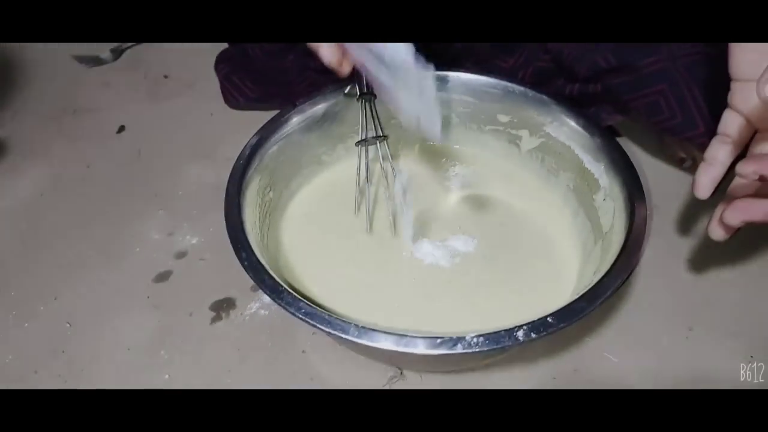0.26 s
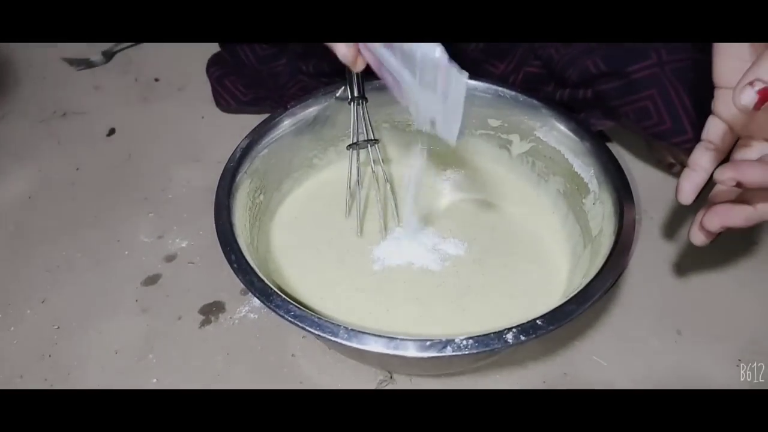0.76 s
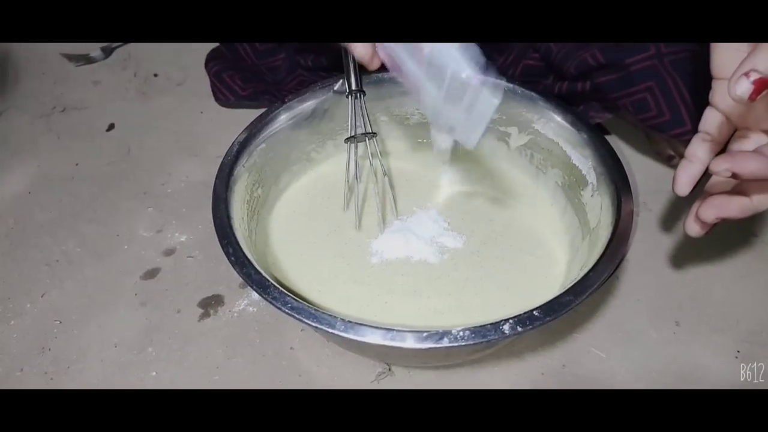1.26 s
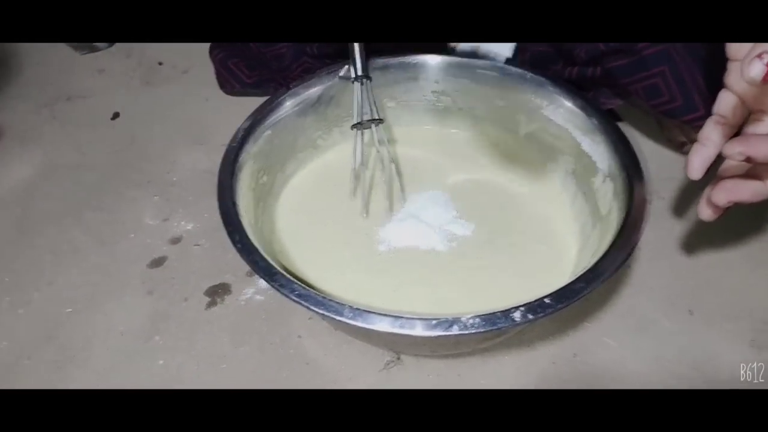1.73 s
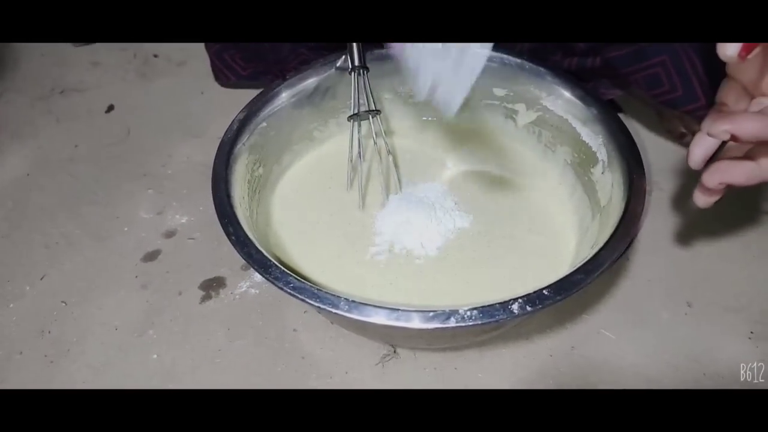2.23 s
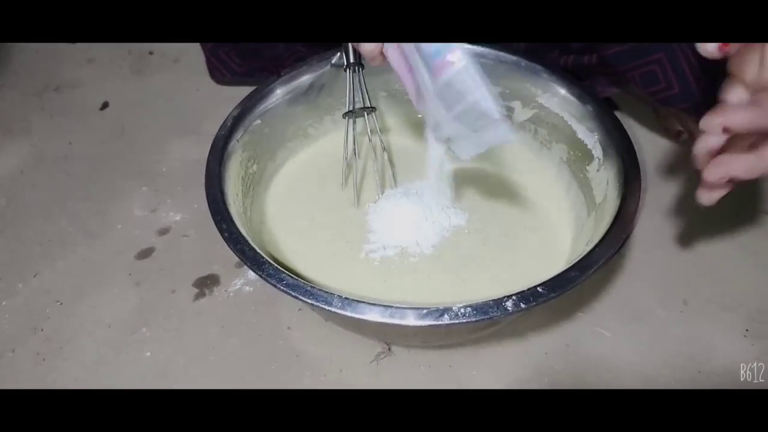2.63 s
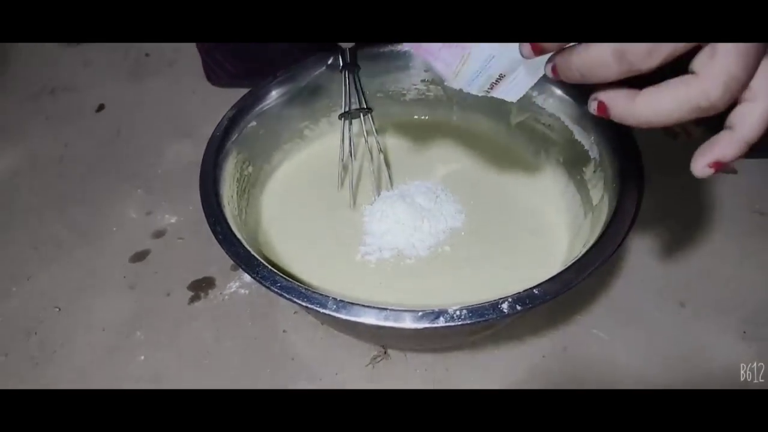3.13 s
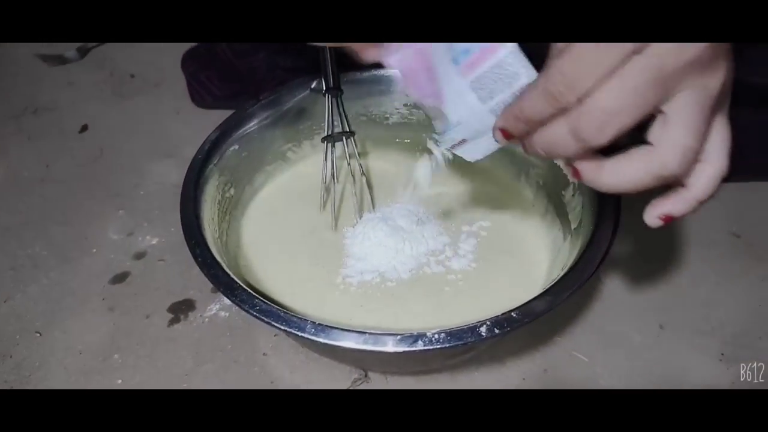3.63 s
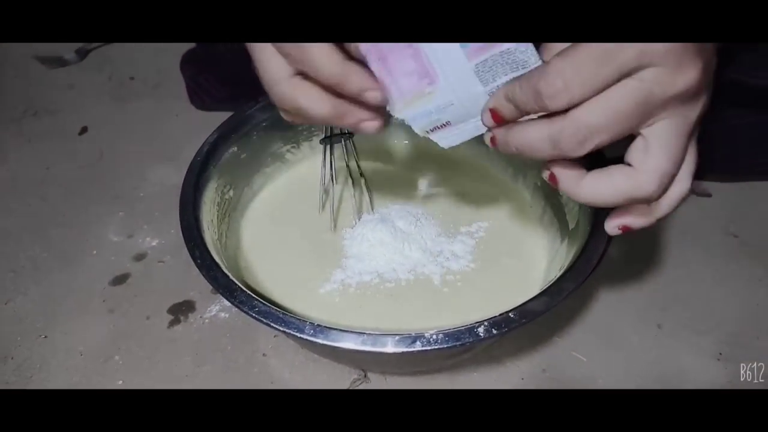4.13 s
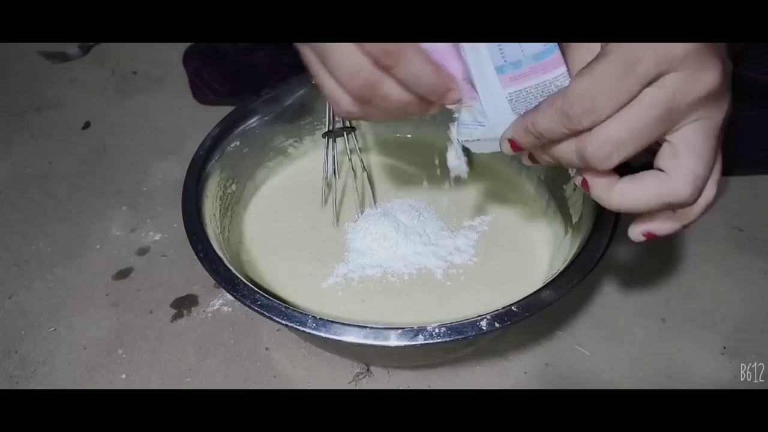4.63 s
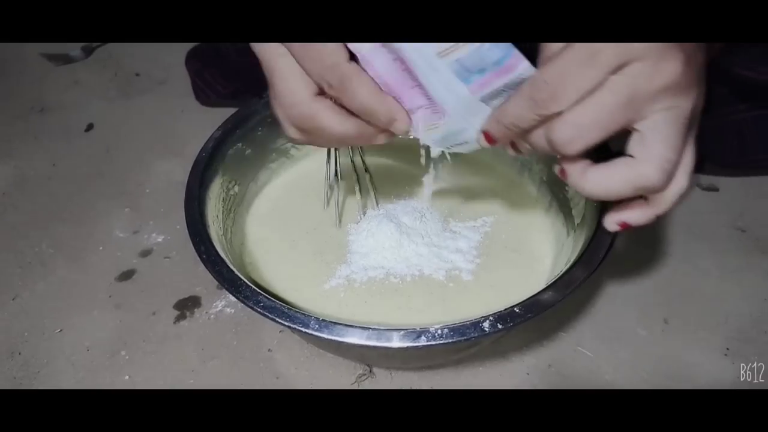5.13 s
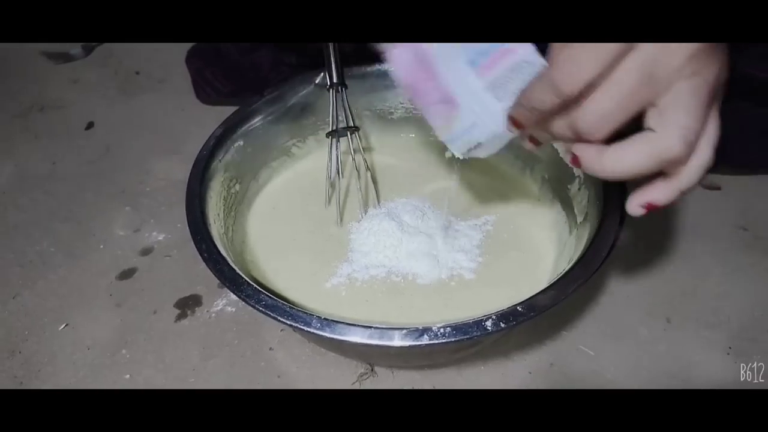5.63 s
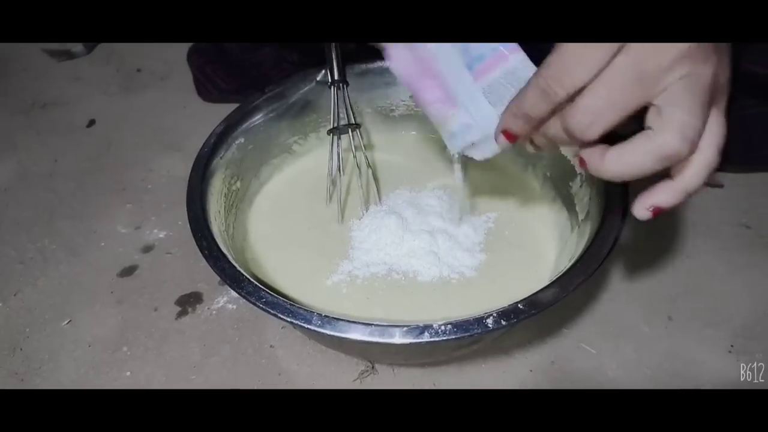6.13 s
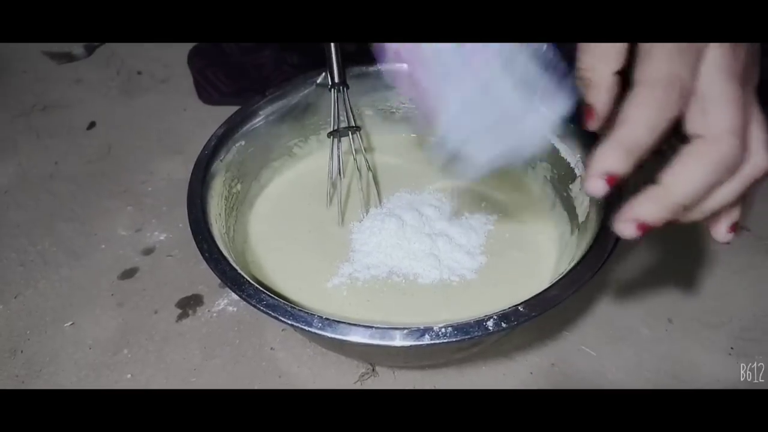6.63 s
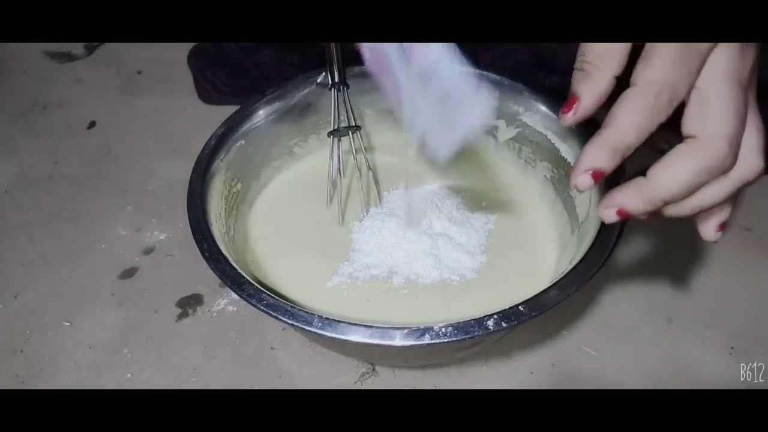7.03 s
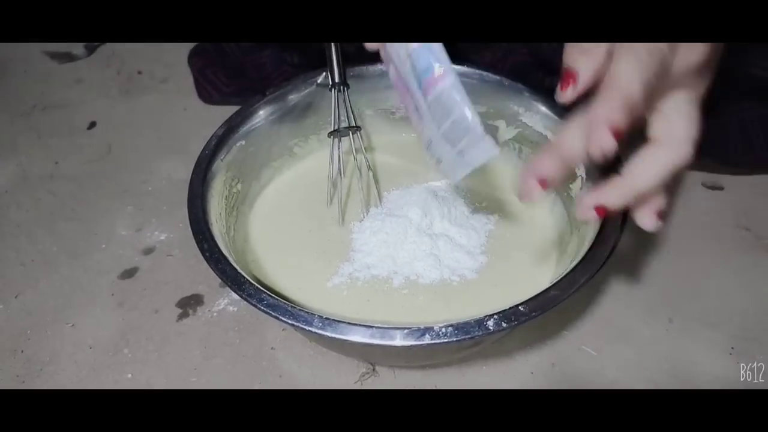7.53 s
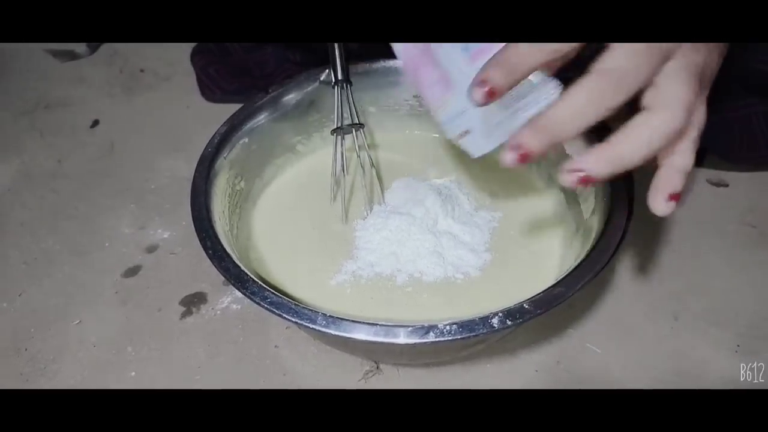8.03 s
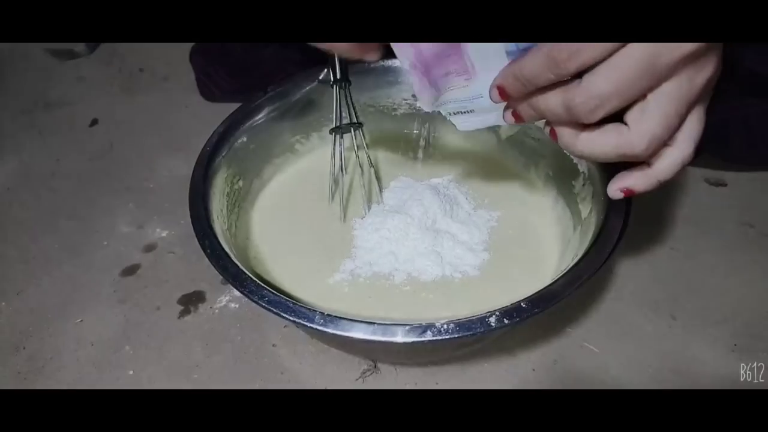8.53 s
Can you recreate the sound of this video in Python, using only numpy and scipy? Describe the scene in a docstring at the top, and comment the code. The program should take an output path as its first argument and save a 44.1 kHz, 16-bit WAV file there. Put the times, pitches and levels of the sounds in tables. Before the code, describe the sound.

A thin plastic packet is shaken and crinkled as powder hisses out, close by in a quiet kitchen with faint crickets outside.

```python
"""A quiet kitchen at night, one microphone close to a steel bowl of batter.
Just over the bowl a thin plastic packet is shaken, then squeezed: powder hisses as it slides, creases
buckle with a snap and a brief ring, fingers rub the soft filling, and metal jewellery on the hand tinkles.
Farther off, over a low hum, crickets trill outside with their wings, a higher insect chirps,
and a faint rasp flutters once at the start."""
import sys
import numpy as np
from scipy import signal
from scipy.fft import rfft, irfft
from scipy.io import wavfile
from scipy.ndimage import uniform_filter1d

SR = 44100
rng = np.random.default_rng(int(sys.argv[2]) if len(sys.argv) > 2 else 0)


def log_audio(samples):
    """Write samples as a 16-bit WAV file to the path given in sys.argv[1]."""
    # one column per channel
    frames = np.atleast_2d(samples).T
    # limit to full scale, then quantise
    limited = np.clip(frames, -1, 1)
    pcm = np.round(limited * 32767).astype(np.int16)
    wavfile.write(sys.argv[1], SR, pcm)


N = 386316


def amp(db):
    """Decibels to gain."""
    return 10 ** (np.asarray(db) / 20)


def rms_one(x):
    """Scale to rms 1."""
    return x / np.sqrt(np.mean(x ** 2) + 1e-20)


def band(x, low_hz, high_hz):
    """Band-pass."""
    return signal.sosfilt(signal.butter(2, [low_hz, high_hz], "band", fs=SR, output="sos"), x)


def highpass(x, hz):
    """Roll off the bass."""
    return signal.sosfilt(signal.butter(3, hz, "high", fs=SR, output="sos"), x)


def colour(x, spectrum):
    """Filter by a (frequency [Hz], level [dB]) spectrum; white noise keeps its rms."""
    hz, db = np.transpose(spectrum)
    grid = np.maximum(np.fft.rfftfreq(len(x), 1 / SR), 1)
    gain = amp(np.interp(np.log(grid), np.log(hz), db, left=-60))
    return irfft(rfft(x) * rms_one(gain), len(x))


def drift(hz):
    """A random wander of rms 1, mostly slower than hz."""
    r = np.exp(-2 * np.pi * hz / SR)
    return rms_one(signal.lfilter([1], [1, -2 * r, r * r], rng.standard_normal(N + SR))[SR:])


def ring(x, hz, t60):
    """One resonance: a unit click starts a dying sine of height about 1."""
    r, w = amp(-60 / (t60 * SR)), 2 * np.pi * hz / SR
    return signal.lfilter([0, np.sin(w)], [1, -2 * r * np.cos(w), r * r], x + 1e-18)


def grains(per_s, spread_db):
    """Random clicks, a few much larger than the rest; rms 1."""
    sizes = amp(spread_db * np.minimum(rng.exponential(1, N), 4)) * rng.choice([-1, 1], N)
    return rms_one(sizes * (rng.random(N) < per_s / SR))


def swells(rows):
    """Bell-shaped envelopes from (time [s], level [dB], half length [s]) rows."""
    t = np.arange(N) / SR
    return sum(amp(db) * np.exp(-((t - s) / half) ** 2) for s, db, half in rows)


# Night air and hum all round the microphone: (frequency [Hz], relative level [dB])
AIR_SPECTRUM = [(40, -14), (121, 5.5), (350, -1.5), (600, -8), (1200, -6.5), (1950, -7), (2250, -0.5),
                (2500, -7.5), (4000, -15), (6300, -20), (7000, -9), (8400, -6), (9400, -15), (12500, -17.5),
                (15600, -18)]


def night_air():
    """Room tone: steady noise with a low hum, and one thin, faint tone."""
    air = amp(-59.5) * colour(rng.standard_normal(N), AIR_SPECTRUM)
    thin_tone = rms_one(ring(rng.standard_normal(N), hz=2735, t60=.07))
    return air + amp(-73) * thin_tone


# Bouts of cricket song out in the yard: (time [s], phrase spacing [s], relative level [dB])
CRICKET_BOUTS = [(-.08, .31, -58), (.46, .3, -58), (1.02, .245, -57), (3.24, .31, -58), (6.87, .265, -58),
                 (8.24, .26, -57)]
# Length of each bout: (phrases [count])
PHRASES_PER_BOUT = 1, 2, 7, 12, 4, 2


def crickets():
    """Phrases of wing strokes, each stroke falling in pitch; the yard smears them into a narrow wash."""
    strokes_per_s, centre_hz, fall_hz = 22, 4723, 422
    sung_share, yard_t60_s = .84, .16
    t, song, level = np.arange(N) / SR, np.zeros(N), np.zeros(N)
    waver_hz = 70 * drift(53.7)
    for (first, gap, db), count in zip(CRICKET_BOUTS, PHRASES_PER_BOUT):
        length = sung_share * gap
        for start in first + gap * np.arange(count):
            on = (t >= start) & (t < start + length)
            age = t[on] - start
            stroke = (strokes_per_s * age) % 1
            hz = centre_hz + fall_hz * (.5 - stroke) + waver_hz[on]
            tone = np.sin(2 * np.pi * np.cumsum(hz) / SR)
            level[on] = amp(db) * np.sin(np.pi * age / length) ** .4
            song[on] = level[on] * np.sin(np.pi * stroke) ** .83 * tone
    fade = amp(-2 * 60 / (yard_t60_s * SR))
    lingering = np.sqrt(signal.lfilter([1 - fade], [1, -fade], level ** 2))
    wash = rms_one(band(band(rng.standard_normal(N), 4540, 5010), 4540, 5010))
    far_singers = amp(-74)
    flicker = amp(2 * drift(130))
    return 1.44 * song * flicker + (amp(-8) * lingering + far_singers) * wash


# The swell of a rasp far from the microphone: (time [s], relative level [dB], half length [s])
RASP_SWELL = (0.16, -56, 0.32)
# Its resonances: (frequency [Hz], relative level [dB], t60 [s])
RASP_RESONANCES = [(755, -21, 0.017), (1540, 3, 0.0094), (1750, 0, 0.022), (2100, -8, .015)]


def far_rasp():
    """One swell of noise with seven quick beats on top, sounding through a few resonances."""
    beats = [(.022 + k * .063, -57.5, .01) for k in range(7)]
    flutter = swells([RASP_SWELL] + beats) * rng.standard_normal(N)
    return amp(-24) * sum(amp(db) * ring(flutter, hz, t60) for hz, db, t60 in RASP_RESONANCES)


# Bouts of a higher insect outside: (time [s], chirp spacing [s], chirps [count])
INSECT_BOUTS = [(.15, .232, 6), (1.57, .255, 6), (3.07, .225, 6), (4.42, .25, 9), (6.72, .233, 9)]


def high_insect():
    """Short, evenly spaced chirps of narrow, high noise."""
    chirps = swells([(s + k * gap, -64.5, .028) for s, gap, count in INSECT_BOUTS for k in range(count)])
    return chirps * rms_one(ring(rng.standard_normal(N), hz=8860, t60=.035))


# Shakes of the packet, close to the microphone: (time [s], level [dB])
PACKET_SHAKES = [(.346, -61), (.593, -48.5), (.855, -50), (1.147, -49), (1.428, -53), (1.704, -44),
                 (1.982, -42.5), (2.234, -43), (2.524, -45), (2.776, -43.5), (2.914, -65), (6.82, -41.5),
                 (7.07, -44), (7.21, -57), (7.348, -42), (7.58, -46.5), (7.801, -47.5), (8.06, -46),
                 (8.44, -53), (8.63, -54)]


def shaking():
    """Envelope of the shakes: a weaker forward stroke leads each back stroke."""
    flick_s, swing_s, swings_from_s = .018, .034, 3   # half lengths: quick flicks, then looser swings
    lead_s, lead_db = .049, -10
    back = [(s, db, flick_s if s < swings_from_s else swing_s) for s, db in PACKET_SHAKES]
    forward = [(s - lead_s, db + lead_db, half) for s, db, half in back]
    return swells(back + forward)


# Powder sliding on plastic, heard close: (frequency [Hz], relative level [dB])
POWDER_SPECTRUM = [(2500, -7.5), (5800, -10.5), (7250, -3), (11600, 4.5), (13800, -4.5), (15600, 5)]


def sliding_powder(shakes):
    """Each shake throws the powder along the film; its tiny clicks merge into a hiss."""
    return shakes * colour(grains(per_s=9000, spread_db=4), POWDER_SPECTRUM)


# Crests of a soft hiss in the background: (time [s])
HISS_TIMES = [.48, 1.7, 3.22]
# Its colour: (frequency [Hz], relative level [dB])
HISS_SPECTRUM = [(6000, -8), (7500, 7), (9300, 10), (11500, -17)]


def soft_hiss():
    """A narrow, high hiss swells and fades."""
    envelope = swells([(s, -58, .059) for s in HISS_TIMES])
    return envelope * colour(rng.standard_normal(N), HISS_SPECTRUM)


# Resonances of the packet: (frequency [Hz], width [Hz], relative level [dB])
FILM_RESONANCES = [(686, 110, 0), (1820, 75, 4), (2230, 33, -0.5), (2632, 22, -7), (3260, 300, 7.5)]


def film_body(x):
    """The packet's broad voice with its resonances on top."""
    ringing = sum(amp(db) * ring(x, hz, 1.02 / width) for hz, width, db in FILM_RESONANCES)
    return band(x, 580, 3930) + amp(-31.5) * ringing


# Creases buckling close to the microphone: (time [s], ring level [dB], brightness [dB], ring pitch [Hz])
CREASES = [(0.7936, -43.5, -25, 1430), (0.8668, -37, -11.5, 1830), (1.8938, -37, -23, 2230),
           (1.925, -35, -13, 1720), (1.954, -41, -5, 1770), (1.9835, -37, -1.5, 3870),
           (2.167, -36.5, -16, 1420), (2.4569, -32.5, -15, 1520), (2.7125, -34.5, -15, 1720),
           (2.7657, -43.5, -3, 1760), (3.205, -34, -10, 3920), (3.3282, -36.5, -15, 1750),
           (3.3583, -31, -24, 1390), (3.3812, -37, -25, 1740), (3.4126, -30, -24, 1450),
           (3.473, -41.5, -33, 1400), (3.562, -34.5, -24, 3980), (3.607, -38, 1, 3360),
           (3.613, -29, -1.5, 1710), (3.645, -41, -22, 1380), (3.7184, -28.5, -18, 1740),
           (3.797, -42, -19, 1750), (3.8227, -34.5, -13, 1830), (3.8352, -26.5, -11.5, 1830),
           (3.906, -42, -12, 3310), (3.9177, -33.5, -7, 1770), (3.9422, -33, -18, 1400),
           (3.9577, -35, -13, 1580), (3.982, -33, -29, 1850), (3.998, -34, -22, 1460),
           (4.069, -36.5, -32, 1800), (4.3969, -35.5, -32, 1410), (4.4716, -30, -8, 1860),
           (4.4864, -22.5, -6.5, 2170), (4.5491, -24.5, -14, 1820), (4.5998, -10.5, -9.5, 1950),
           (4.6346, -24, -10, 1650), (4.6717, -28, -14, 1840), (4.7464, -25, -30, 1550),
           (4.7666, -17, -7.5, 1710), (4.792, -21.5, -7, 3760), (4.815, -28.5, -9, 1580),
           (4.8605, -17, -12, 3550), (4.8965, -31.5, -5, 1840), (4.918, -14.5, -15, 1750),
           (4.9246, -8, -18.5, 2190), (4.9331, -12, -9, 2710), (5.0556, -19, -2.5, 4200),
           (5.0814, -27, 0, 1870), (5.1102, -24.5, -3.5, 1820), (5.1435, -28, -15, 1850),
           (5.1516, -28, -6, 2170), (5.1796, -14, -2, 1800), (5.2216, -17, -5, 1780),
           (5.2415, -17, -15, 1940), (5.2851, -20, -14.5, 1910), (5.3253, -25, -12, 2150),
           (5.3642, -23, -27, 1490), (5.5353, -20.5, 0, 1650), (5.5931, -27, 7, 3800),
           (5.678, -17.5, -3, 1440), (5.7055, -26.5, 0.5, 1910), (5.799, -33.5, -22, 1350),
           (5.8187, -30, -14, 1280), (5.8329, -10.5, -7, 1360), (5.9295, -25, -5, 3340),
           (5.9404, -15, -5.5, 1660), (5.9693, -20, -0.5, 1370), (5.9973, -15, 4, 2150),
           (6.0698, -13.5, -4, 1820), (6.0975, -13.5, -15, 1820), (6.1462, -23, -31, 1780),
           (6.1613, -12.5, -13, 1580), (6.1771, -18, -13, 1730), (6.1916, -11, -9, 1800),
           (6.2039, -15, 4.5, 1330), (6.281, -12.5, 0, 2310), (6.2995, -14.5, -7, 1640),
           (6.3083, -20, 1, 1590), (6.332, -12.5, -2.5, 2200), (6.35, -15, -7, 3280),
           (6.3859, -15.5, -4, 1790), (6.3926, -13.5, -1, 3360), (6.4098, -13, -11.5, 1820),
           (6.4349, -8, -3.5, 1820), (6.4664, -22, -11, 1820), (6.4795, -15.5, -18, 3320),
           (6.4972, -19.5, -3, 2160), (6.56, -16.5, -1.5, 1990), (6.5982, -19.5, -13, 3180),
           (6.6249, -25, -9.5, 1970), (6.793, -30, -13.5, 1500), (6.8246, -30.5, -12, 1950),
           (6.867, -35, -10.5, 1690), (7.2789, -30.5, -4.5, 3550), (7.3244, -31.5, 2, 1310),
           (7.355, -52, 11, 2220), (7.5888, -59, 20, 2100), (7.743, -49, 3, 2640), (7.7824, -37, -7, 2430),
           (8.0437, -28, -8, 2330), (8.08, -29, -8.5, 2330), (8.2072, -36.5, -7, 1260),
           (8.2412, -34, -34, 2610), (8.288, -40, -12, 1840), (8.306, -32, -6, 1840),
           (8.3853, -29.5, -4, 3870), (8.4226, -21.5, -8, 1700), (8.4843, -33, -6, 3550),
           (8.557, -43, -10, 1480), (8.5966, -33, -19, 1660), (8.6144, -46, 7, 3360),
           (8.6337, -48, 11, 1700), (8.6852, -37.5, -12, 1390)]
# The bright crack of the film: (frequency [Hz], relative level [dB])
CRACK_SPECTRUM = [(2350, -22.5), (4000, 0), (5400, -5.5), (7300, 2.5), (9900, 3), (13800, 0), (15600, -1.5)]
CRACK_DB = 8   # lift of every crack over its ring, added to the brightness


def crease_snaps():
    """A crease buckles in a quick run of dying clicks: a dull ring of the panel and a bright crack."""
    size = round(.06 * SR)
    t = np.arange(size) / SR
    rings, cracks = np.zeros(N + size), np.zeros(N + size)
    noises = rng.standard_normal((len(CREASES), 3, size))
    run = np.minimum(t / .000057, 1) * amp(-2200 * t) / (1 + (t / .0058) ** 6)   # the fold runs, then stops
    settle = np.minimum(t / .002, 1) * amp(-10 - 60 * t / .06)
    kick_envelope = np.minimum(t / .00053, 1) * amp(-60 * t / .03)
    for (s, ring_db, bright_db, hz), (slips, fizz, lumps) in zip(CREASES, noises):
        kicks = slips * np.abs(slips) * kick_envelope
        panel = .22 * ring(kicks, hz, t60=.005) + film_body(kicks)
        uneven = amp(22 * uniform_filter1d(lumps, size=30))   # it slips in fits
        crack = fizz * uneven * (run + settle)
        at = round(s * SR)
        rings[at:at + size] += amp(ring_db) * panel / np.abs(panel).max()
        cracks[at:at + size] += amp(ring_db + bright_db + CRACK_DB) * crack / np.abs(crack).max()
    return highpass(rings[:N], 620) + colour(cracks[:N], CRACK_SPECTRUM)   # film moves no bass


def after_snaps(db, t60):
    """An envelope that jumps at every snap and dies away."""
    power = np.zeros(N)
    power[(np.array(CREASES)[:, 0] * SR).astype(int)] = amp(2 * db)
    fade = amp(-2 * 60 / (t60 * SR))
    return np.sqrt(signal.lfilter([1], [1, -fade], power + 1e-18))


# Fingers working the film, close up: (time [s], crackle level [dB], pressure on the filling [dB])
FINGER_GRIP = [(1.8, -71.5, 1), (3.23, -75, -3.5), (3.87, -59.5, 4.5), (4.14, -66, 3), (4.48, -61.5, -1),
               (4.71, -54, -2), (5.23, -46, -3), (5.37, -59, -5), (5.58, -52, 0), (6.32, -41.5, 3.5),
               (6.47, -44, 5.5), (6.62, -54.5, 2.5), (7.36, -71, -7.5), (8.08, -68, 2.5), (8.47, -62, 6.5),
               (8.76, -63.5, -12)]


def grip_curves():
    """Crackle level and pressure in dB at every sample; silence before and after."""
    s, *columns = np.transpose(FINGER_GRIP)
    return [np.interp(np.arange(N) / SR, s, column, left=-120, right=-120) for column in columns]


def film_crackle(grip_db, shakes):
    """Small creases give way in clumps under the fingers, after each snap and faintly with each shake."""
    _, ring_db, bright_db, _ = np.transpose(CREASES)
    crack_db = ring_db + bright_db + CRACK_DB
    dull = amp(grip_db) + after_snaps(ring_db - 15, t60=.083) + amp(-16.5) * shakes
    bright = amp(grip_db - 3.5) + after_snaps(crack_db - 14, t60=.083)
    crackle = rms_one(film_body(grains(per_s=2500 * amp(4 * drift(33)), spread_db=5)))
    ticks = colour(grains(per_s=2000 * amp(6 * drift(60)), spread_db=6), CRACK_SPECTRUM)
    return dull * highpass(crackle, 600) + bright * ticks


def filling_rub(pressure_db):
    """Pressed by the fingers, the soft filling rubs and thumps dully with each snap."""
    ring_db = np.array(CREASES)[:, 1]
    thumps = amp(pressure_db) * after_snaps(-38.5 + .54 * ring_db, t60=.11)
    rub = rms_one(band(grains(per_s=500, spread_db=3.5), 218, 480))
    return band(thumps * rub, 89, 1000)


# Jewellery knocking on the hand, close to the microphone: (time [s], level [dB])
JEWELLERY_KNOCKS = [(7.323, -42), (7.327, -45), (7.587, -41.5), (7.59, -45), (7.744, -53), (8.045, -51),
                    (8.5, -54)]
# Modes of the metal: (frequency [Hz], relative level [dB], t60 [s])
JEWELLERY_MODES = [(6270, -5, .09), (8880, -5, .14), (9740, -10, .09), (11200, -8, .04), (12700, -10, .05),
                   (13950, -3, .1), (15180, -12, .06)]


def jewellery(scatter_db=2):
    """Every knock rings every mode of the metal with a strength of its own."""
    times, knock_db = np.transpose(JEWELLERY_KNOCKS)
    at, tinkle = [round(s * SR) for s in times], np.zeros(N)
    for hz, mode_db, t60 in JEWELLERY_MODES:
        clicks = np.zeros(N)
        clicks[at] = amp(knock_db + mode_db + scatter_db * rng.standard_normal(len(at)))
        tinkle += ring(clicks, hz, t60)
    return tinkle


# Decay of the kitchen round the microphone: (frequency [Hz], t60 [s])
KITCHEN_DECAY = [(300, 0.1), (2000, 0.13), (6000, 0.14), (14000, 0.066)]


def kitchen_tail():
    """Diffuse sound that dies soonest in the top treble."""
    t = np.arange(round(.35 * SR)) / SR
    hz, t60s = np.transpose(KITCHEN_DECAY)
    edges_hz, tail = 200 * 2 ** np.arange(0, 6.6, .5), 0   # half octaves
    for low, high in zip(edges_hz, edges_hz[1:]):
        t60 = np.interp(np.log(low), np.log(hz), t60s)
        tail = tail + band(rng.standard_normal(len(t)), low, high) * amp(-60 * t / t60)
    return tail * np.minimum(t / .011, 1) / np.sqrt(np.sum(tail ** 2))


def reflections(x, paths=5):
    """The packet keeps moving, so every 30 ms its sound takes another path round bowl and room."""
    path = np.arange(N) // round(.03 * SR) % paths
    return amp(-6) * sum(signal.fftconvolve(x * (path == k), kitchen_tail())[:N] for k in range(paths))


def scene():
    """At the microphone, in mono: packet and hand up close with their reflections, the night behind."""
    shakes = shaking()
    grip_db, pressure_db = grip_curves()
    packet = crease_snaps() + film_crackle(grip_db, shakes) + sliding_powder(shakes)
    close = packet + filling_rub(pressure_db) + jewellery()
    background = night_air() + crickets() + far_rasp() + high_insect() + soft_hiss()
    return (close + reflections(close) + background)[None]


def record(dry):
    """The loudest peaks are rounded; the top treble drops by a step, then is cut."""
    ceiling, step_hz, step_db, cutoff_hz = .92, 15520, -45, 16650
    rounded = dry / (1 + (dry / ceiling) ** 6) ** (1 / 6)
    body = signal.sosfilt(signal.ellip(12, .5, 70, step_hz, fs=SR, output="sos"), rounded)
    stepped = body + amp(step_db) * rounded
    return signal.sosfilt(signal.cheby2(12, 70, cutoff_hz, fs=SR, output="sos"), stepped)


dry = scene()
out = record(dry)
log_audio(out)
```